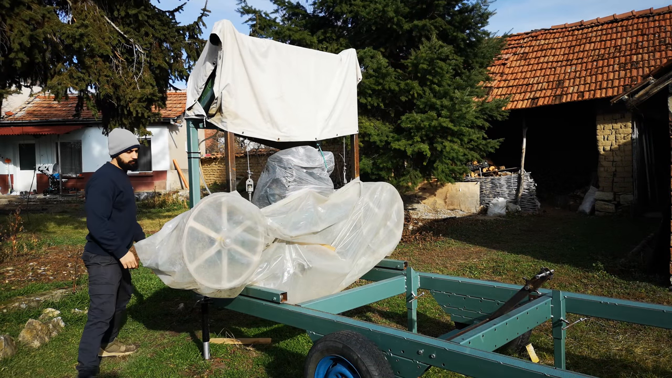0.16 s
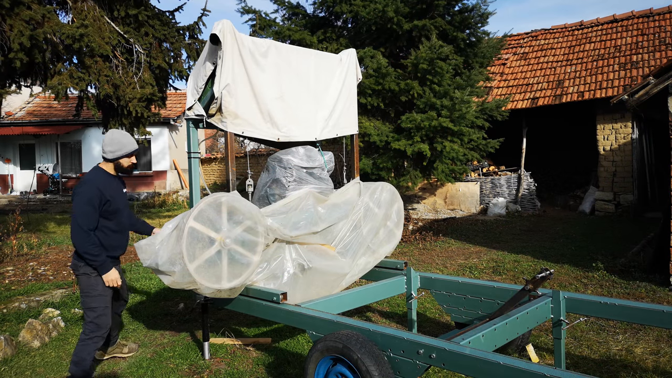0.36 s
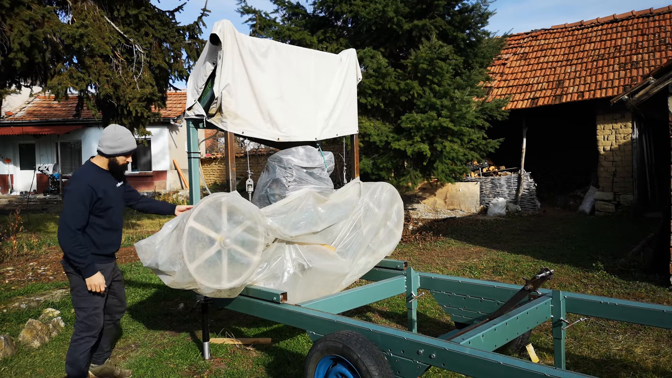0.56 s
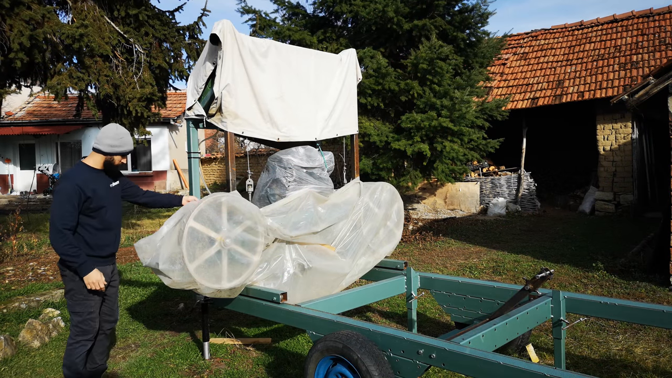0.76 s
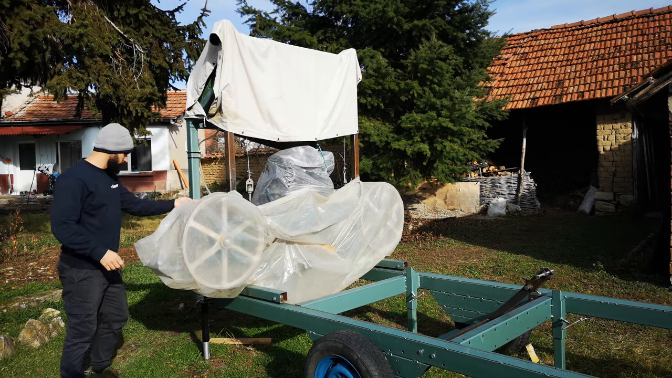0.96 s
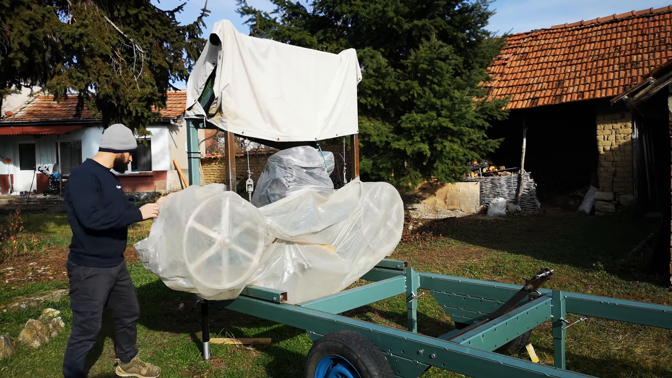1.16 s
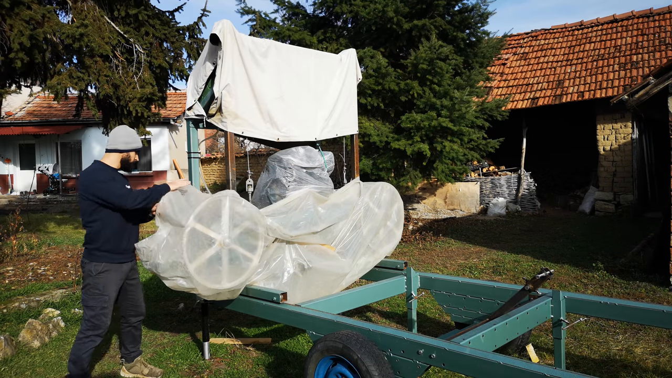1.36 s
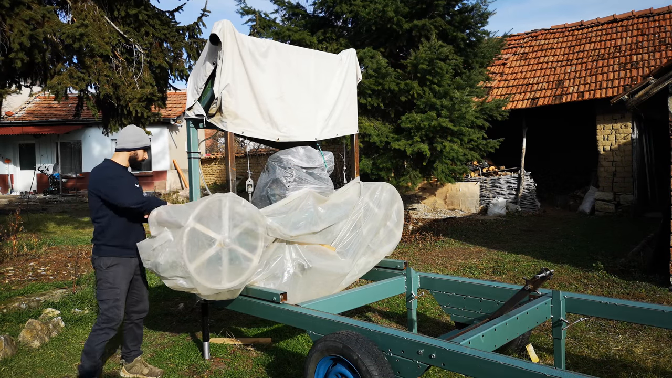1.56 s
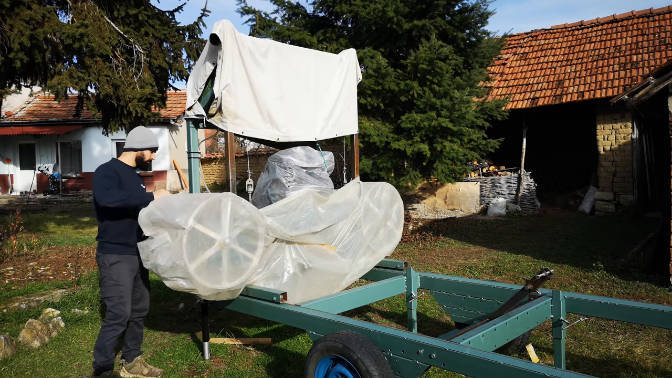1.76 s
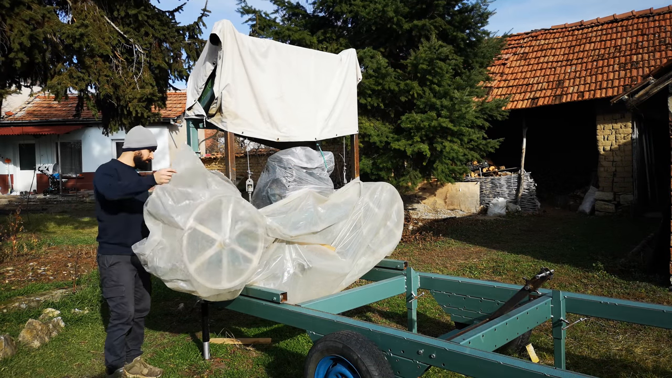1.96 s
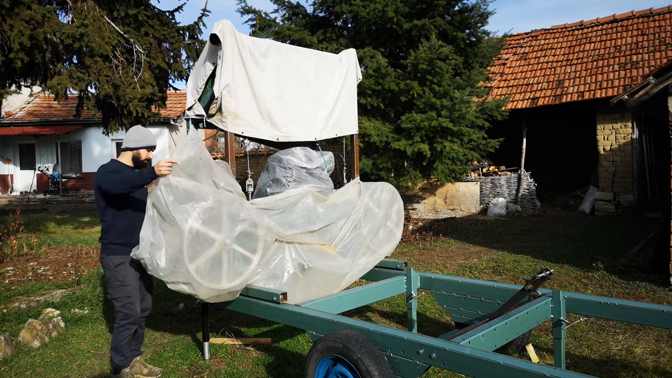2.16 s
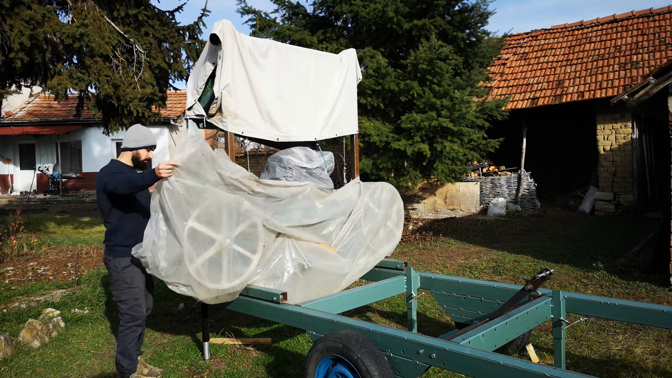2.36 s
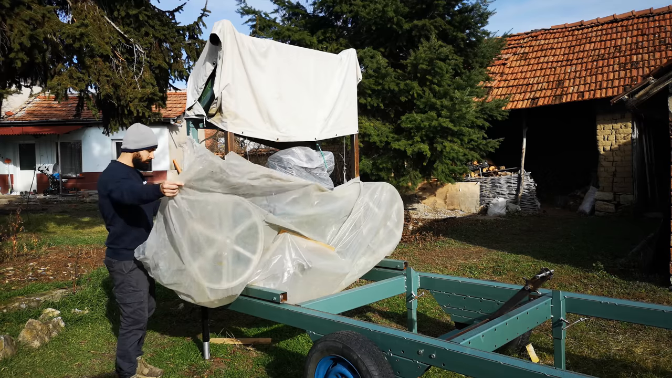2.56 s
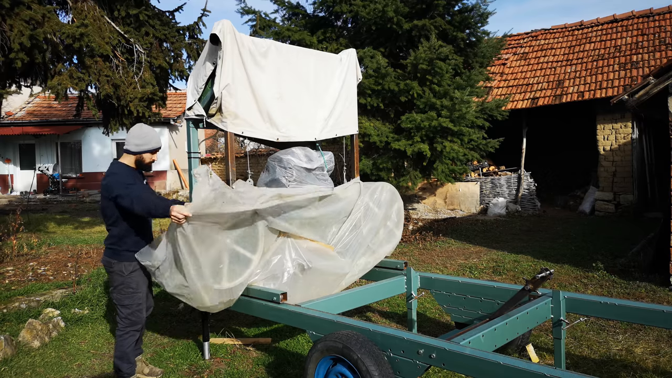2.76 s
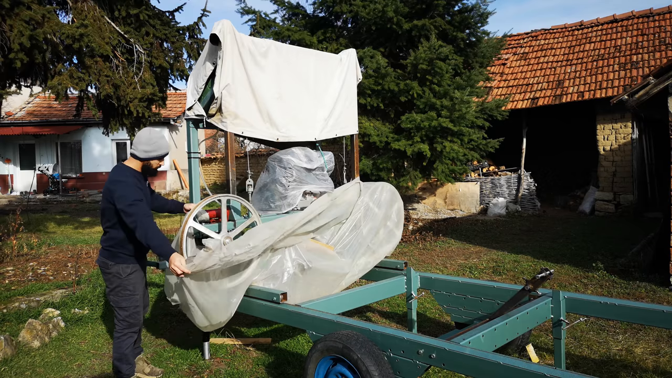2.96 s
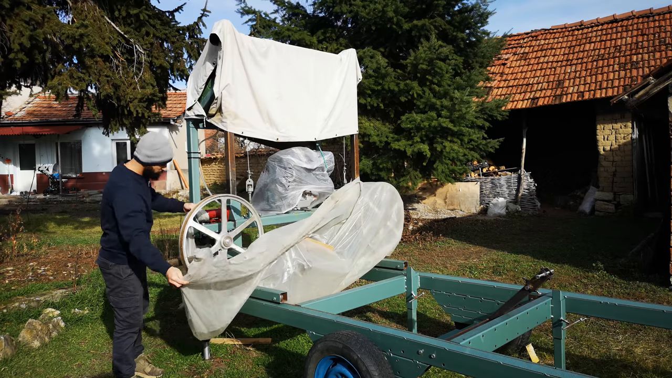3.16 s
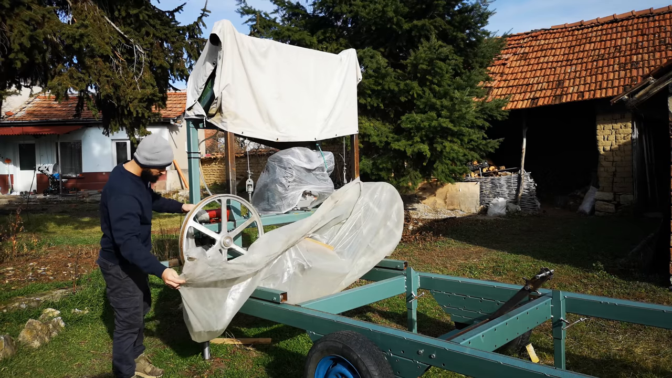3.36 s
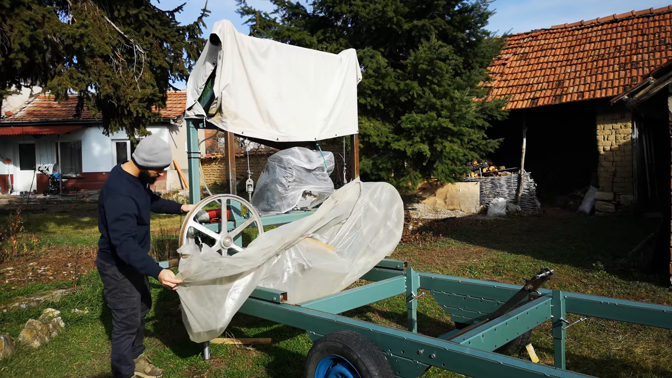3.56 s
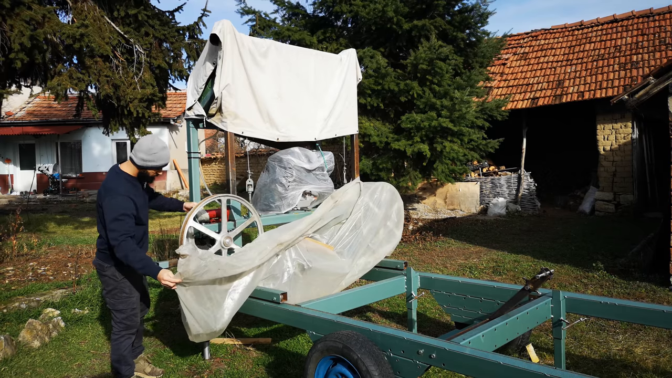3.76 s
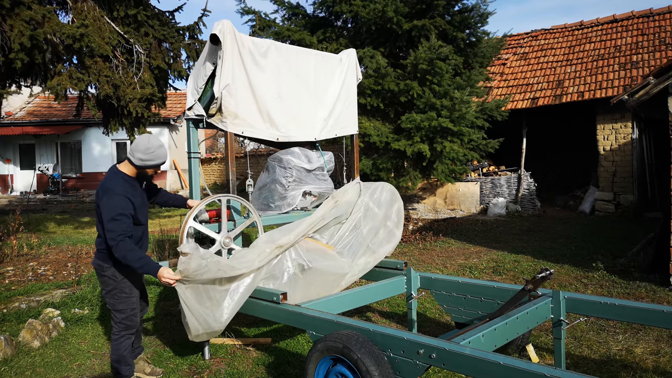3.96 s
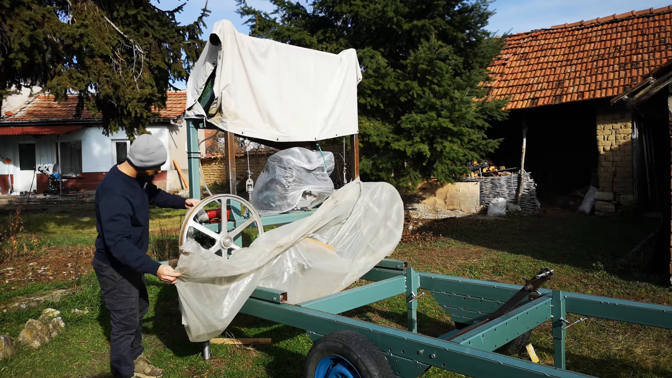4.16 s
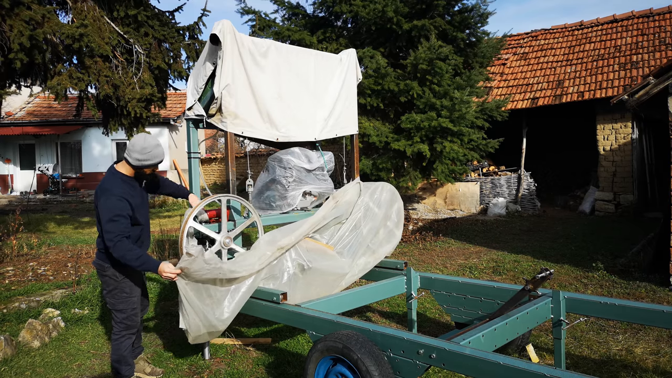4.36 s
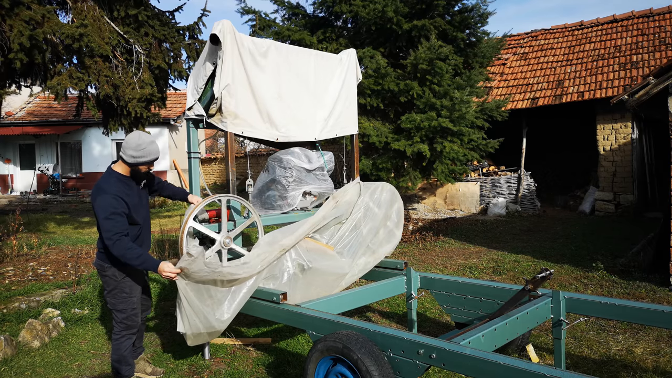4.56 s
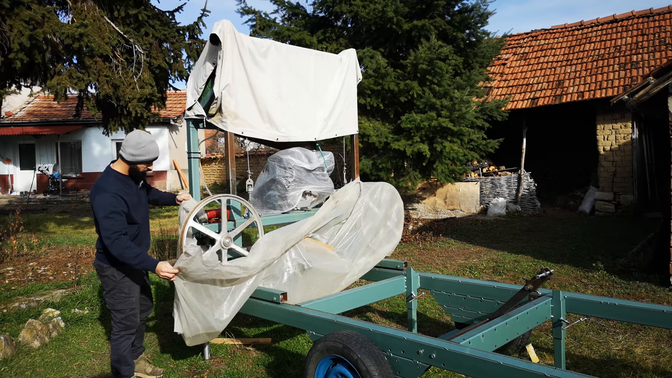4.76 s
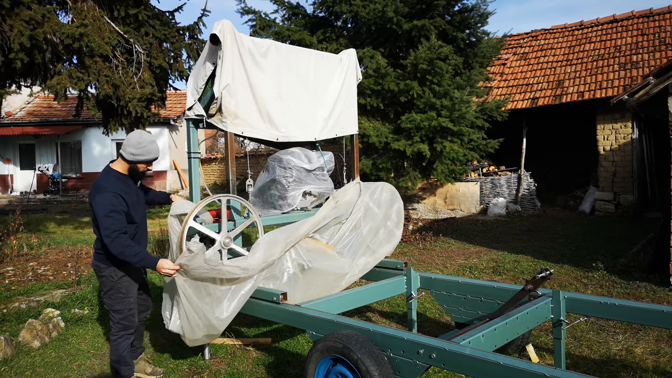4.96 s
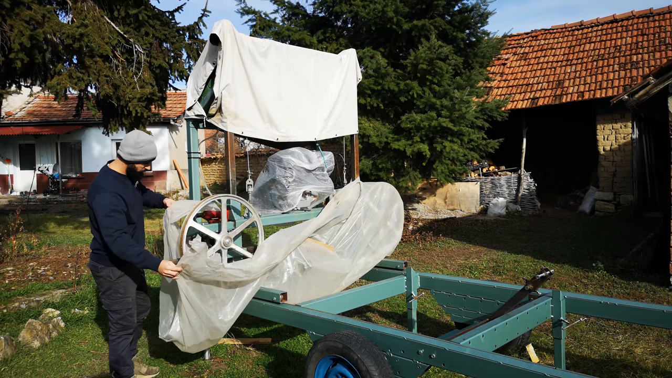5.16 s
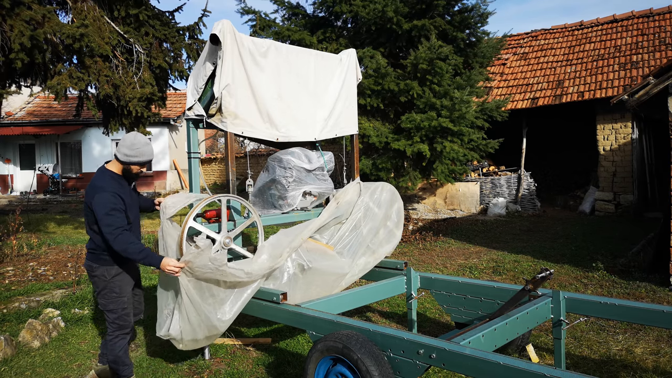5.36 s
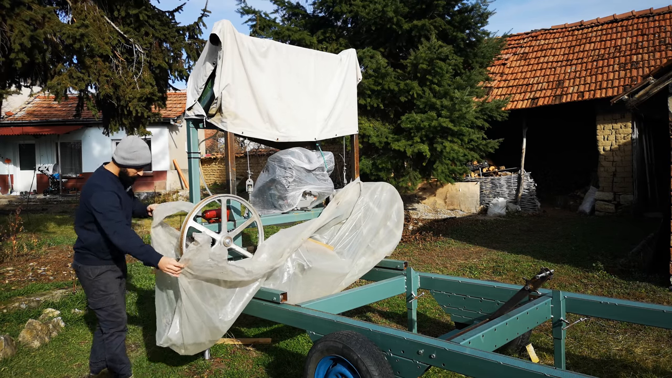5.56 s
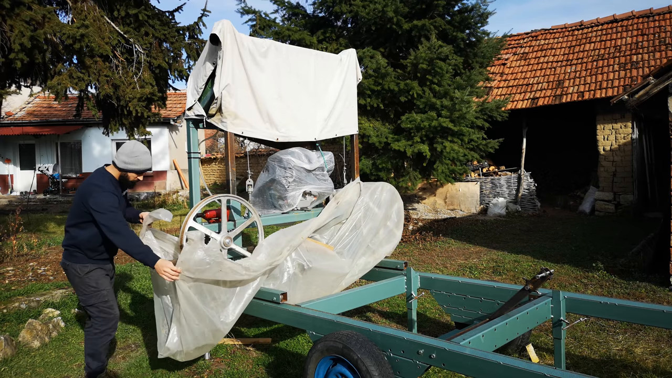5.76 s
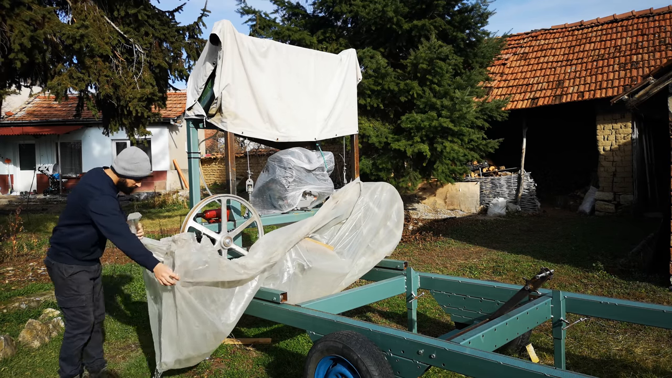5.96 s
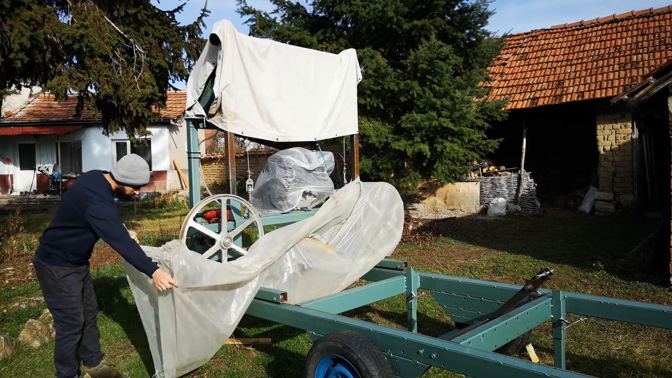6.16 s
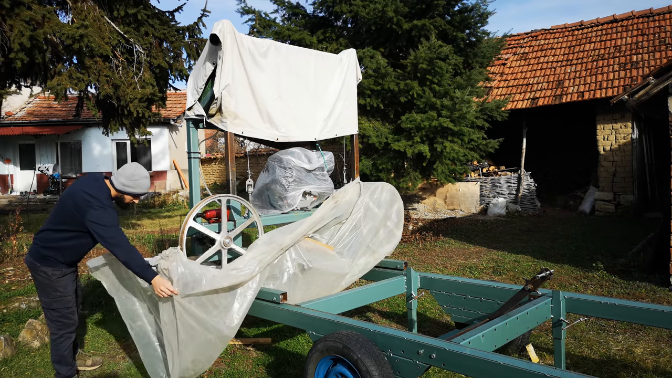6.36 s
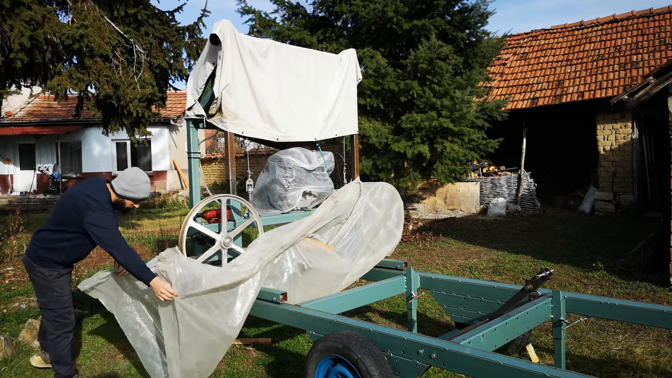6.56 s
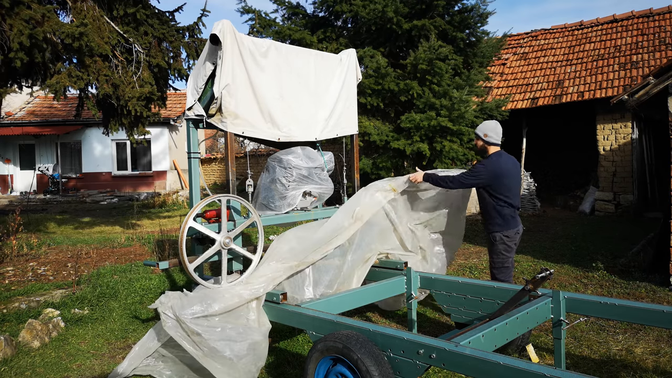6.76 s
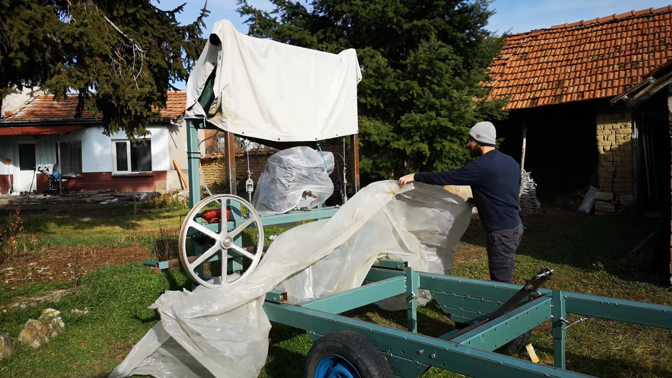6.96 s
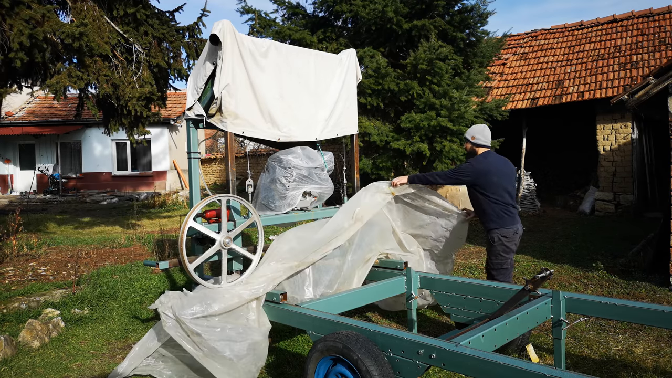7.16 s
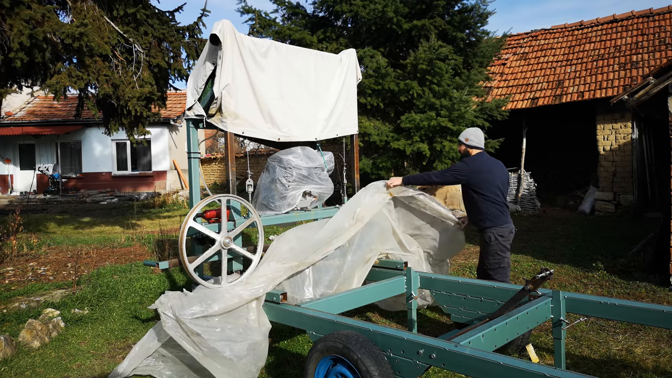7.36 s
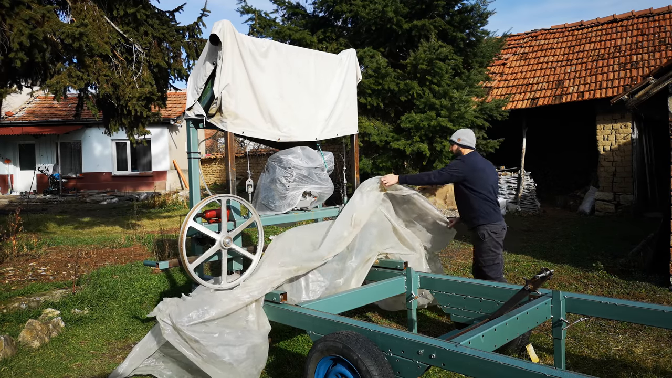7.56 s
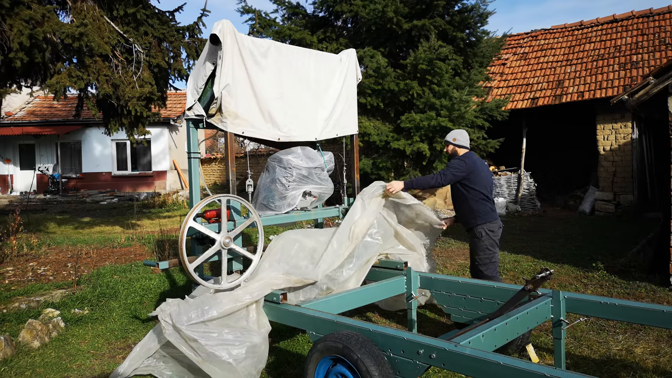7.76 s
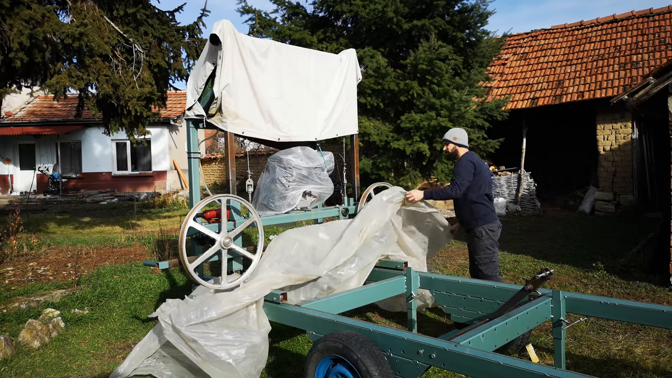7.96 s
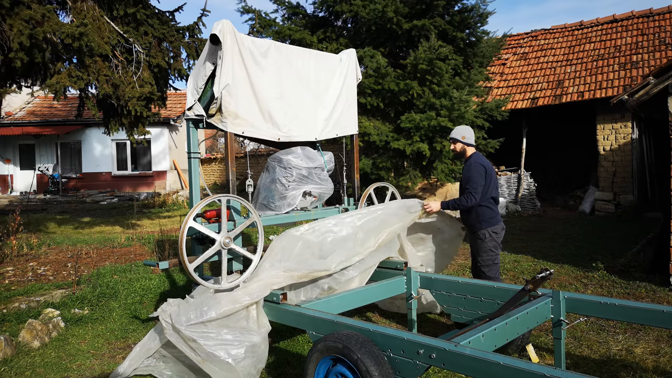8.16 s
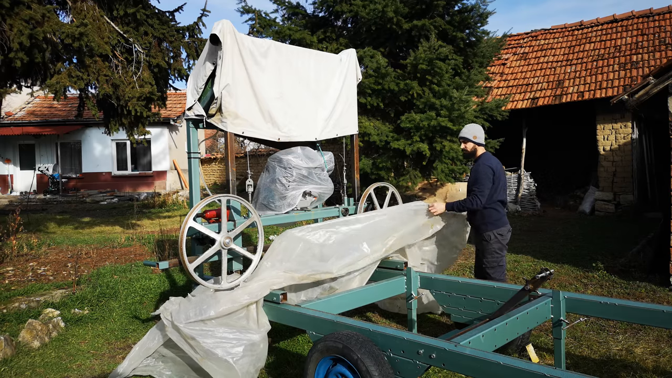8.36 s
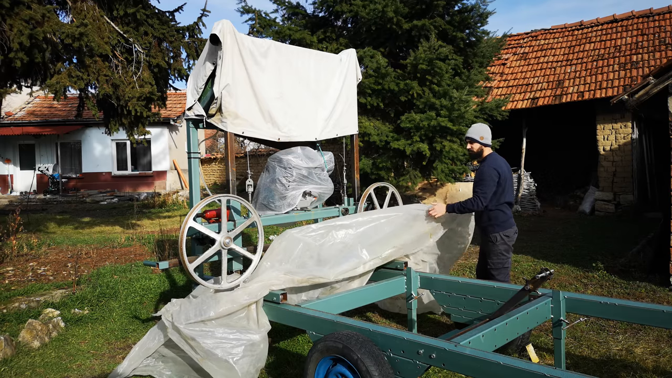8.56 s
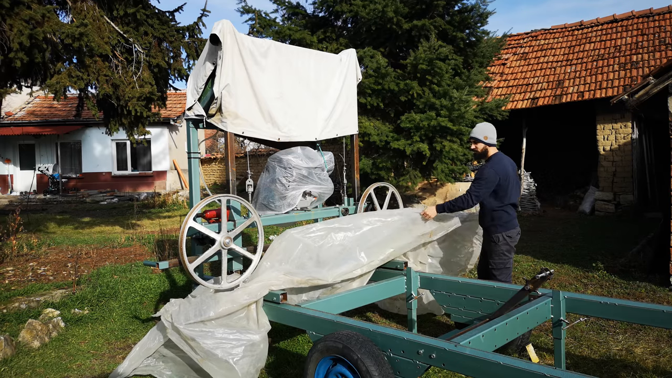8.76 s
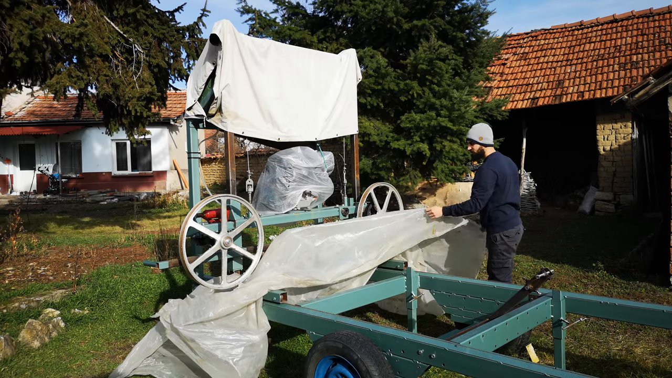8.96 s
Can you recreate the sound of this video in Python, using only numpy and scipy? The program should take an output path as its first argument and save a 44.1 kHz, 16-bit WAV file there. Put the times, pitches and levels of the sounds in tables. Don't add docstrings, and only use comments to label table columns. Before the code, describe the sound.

Thin plastic sheeting crinkles, crackles and snaps in uneven tugs as it is dragged off a metal frame in a quiet yard.

```python
import sys
import numpy as np
from scipy import signal
from scipy.io import wavfile
from scipy.ndimage import uniform_filter1d

SR = 44100
rng = np.random.default_rng(int(sys.argv[2]) if len(sys.argv) > 2 else 0)


def volts_from_db(level):
    exponent = np.asarray(level, float) / 20
    return 10 ** exponent


def waveform_to_disk(signal):
    frames = np.transpose(np.atleast_2d(signal))
    scaled = np.clip(frames, -1, 1) * 32767
    samples = np.round(scaled).astype(np.int16)
    wavfile.write(sys.argv[1], SR, samples)


N = 396900

# [f/Hz, density/dB per Hz]
SHEET_COLOUR = [(60, -47), (150, -15), (290, -12), (600, -13.5), (1000, -5.5), (1920, 0.5), (2700, -2),
                (4100, -9), (5500, -6.5), (6350, -12), (7800, -8), (8400, -16.5), (9900, -23.5),
                (15000, -33)]
# [t/s, lag of the right port/samples]
HANDLER_LAG = [
    (0, 5),
    (6.72, 5),
    (6.76, -3),
    (9, -3),
]
# [t/s, level/dB]
SLACK_CURVE = [
    (0, 6.5),
    (1.5, -1),
    (3, 0.5),
    (4, -4.5),
    (4.9, -6),
    (5.3, 3.5),
    (6.5, 4),
    (7.5, 1.5),
    (9, 6.5),
]
# [t/s, peak level/dB, ring f/Hz]
FOLD_POPS = [(0.737, -43, 1560), (0.787, -36, 1700), (0.893, -36, 1750), (1.244, -32, 1690),
             (1.357, -35, 1450), (1.419, -33, 1740), (1.447, -35, 1850), (2.118, -27, 2220),
             (2.146, -38, 1770), (2.259, -37, 1850), (2.328, -34, 1930), (2.658, -32, 2100),
             (2.97, -37, 1850), (3.026, -35, 1900), (3.169, -34, 1870), (3.194, -26, 2540),
             (4.046, -48, 1920), (4.08, -35, 1580), (4.149, -34, 1900), (4.224, -30, 2580),
             (4.275, -27.5, 1930), (4.355, -39, 1740), (4.655, -35, 1800), (4.709, -23.5, 1880),
             (4.737, -27, 1830), (4.833, -41, 2220), (4.85, -30.5, 2010), (4.905, -36, 1920),
             (5.024, -31, 1850), (5.056, -36, 1820), (5.128, -34, 1970), (5.238, -37, 2190),
             (5.293, -33, 1160), (5.876, -33, 1750), (5.936, -36, 1710), (5.969, -28, 2390),
             (6.092, -37, 1890), (6.161, -34, 2400), (6.178, -27, 1930), (6.222, -34, 1530),
             (6.67, -36, 1290), (6.807, -44, 2350), (6.928, -39, 1380), (6.994, -32, 1510),
             (7.155, -45, 1910), (7.219, -35.5, 1720), (7.367, -37, 2550), (7.574, -42, 2450),
             (7.601, -41, 1880), (7.738, -33, 2260), (7.831, -34, 2380), (7.992, -38, 2800),
             (8.237, -40, 1850), (8.262, -37, 1580), (8.313, -43, 2000), (8.334, -28, 1330),
             (8.386, -32, 2410), (8.431, -28, 1840), (8.862, -39, 1970), (8.967, -40, 1220)]
# [t/s, peak level/dB]
CREASE_TICKS = [(0.7214, -45), (0.7876, -39), (0.875, -36), (0.893, -28), (1.3583, -31), (1.3754, -33),
                (1.446, -36), (1.631, -40), (2.146, -34), (2.6145, -30), (2.6572, -29), (2.7215, -23),
                (2.8735, -29), (2.969, -38), (3.1088, -27), (3.3932, -46), (3.467, -54), (3.6002, -44),
                (3.8864, -45), (4.0484, -42), (4.149, -44), (4.905, -38), (4.9342, -27), (5.059, -37),
                (5.126, -35), (5.1494, -29), (5.2127, -30), (5.2395, -34), (5.2929, -29), (5.6062, -53),
                (5.656, -35.5), (5.7374, -48), (5.7603, -47), (5.8042, -32), (5.9678, -40), (6.092, -29),
                (6.162, -26), (6.1915, -21), (6.2237, -32), (6.3265, -33), (6.3824, -37), (6.541, -38),
                (6.8823, -39), (7.003, -34), (7.1551, -49), (7.1807, -42), (7.3672, -27.5), (7.4654, -41),
                (7.5752, -36), (7.992, -32), (8.059, -56), (8.105, -51), (8.2003, -49), (8.2372, -37),
                (8.2631, -40), (8.3323, -41), (8.3833, -19), (8.4124, -36), (8.4314, -26), (8.4776, -27)]
# [t/s, peak level/dB]
MORE_TICKS = [(1.0006, -49), (1.0231, -51), (1.045, -44), (1.0869, -40), (1.117, -42), (1.1806, -33),
              (1.4897, -44), (1.541, -40), (1.6651, -36), (1.7953, -30), (1.8194, -35), (1.8447, -33),
              (1.9051, -39), (1.9674, -38), (2.0354, -33), (2.057, -40), (2.4468, -32), (3.0849, -35),
              (3.312, -38), (3.3538, -44), (3.9424, -47), (4.125, -41), (4.1764, -43), (4.2984, -36),
              (4.3934, -40), (4.4376, -33), (4.471, -37), (4.5121, -45), (4.6199, -34), (4.814, -23.5),
              (5.0874, -36), (5.3254, -41), (5.3961, -45), (5.48, -42), (5.6311, -45), (5.782, -43),
              (5.8436, -41), (6.1116, -33), (6.3485, -40), (6.8528, -55), (6.9576, -40), (7.13, -36),
              (7.1957, -41), (7.248, -42), (7.296, -49), (7.348, -39), (7.4116, -47), (7.4464, -46),
              (7.4944, -43), (7.5408, -36), (8.0461, -44), (8.285, -36), (8.527, -48), (8.5485, -41),
              (8.6, -47), (8.635, -52), (8.6857, -54), (8.7014, -47), (8.7804, -49), (8.8854, -45)]


def evened(x):
    return x / np.sqrt(np.mean(x ** 2) + 1e-20)


def read(points, hz):
    f, value = np.transpose(points)
    return np.interp(np.log(hz + 1), np.log(f + 1), value)


def response(points):
    log_gain = np.log(volts_from_db(read(points, abs(np.fft.fftfreq(8192, 1 / SR)))))
    return np.fft.ifft(np.exp(np.conj(signal.hilbert(log_gain)))).real[:4096]


def colour(x, points):
    return signal.oaconvolve(x, response(points)[None], axes=1)[:, :N]


def yard():
    # [f/Hz, density/dB per Hz]
    murmur = [(53, -18), (90, 0), (183, -9.5), (574, -6.5), (626, -4), (1300, -14), (1690, -10),
              (3990, -19), (7450, -21.5), (10100, -32), (15500, -23)]
    # [f/Hz, correlation]
    likeness = [(60, 0.43), (150, 0.9), (300, 0.019), (600, -1), (1500, -0.041), (15000, 0.068)]
    frames, hz = N // 256 + 5, np.fft.rfftfreq(1024, 1 / SR)
    a, b, c, d = rng.standard_normal((frames, 513, 4)).T
    same = np.clip(read(likeness, hz), -1, 1)[:, None]
    left = a + 1j * b
    right = same * left + np.sqrt(1 - same ** 2) * (c + 1j * d)
    z = np.array([left, right]) * volts_from_db(read(murmur, hz))[:, None]
    noise = signal.istft(z, nperseg=1024, noverlap=768)[1][:, :N]
    return volts_from_db(-71.0) * evened(noise)


def swells(rows, roundness, rest_db, s):
    power = volts_from_db(2 * rest_db)
    for peak, rise, fall, db in rows:
        away = np.where(s < peak, (peak - s) / rise, (s - peak) / fall)
        power = power + volts_from_db(2 * (db - 20 * away ** roundness))
    return 10 * np.log10(power)


def pull(s):
    # [peak t/s, rise/s, fall/s, effort/dB, tautness/dB]
    tug_rows = [(0.43, 0.1, 0.04, -74, -20.0), (0.82, 0.14, 0.036, -52.5, -8),
                (0.889, 0.15, 0.065, -43.5, -4.5), (1.12, 0.15, 0.1, -52.5, -21), (1.24, 0.17, 0.25, -44, -7.5),
                (1.329, 0.12, 0.12, -40, -5.5), (1.52, 0.45, 0.096, -53, -7.5),
                (1.68, 0.069, 0.13, -47.5, -7.5), (1.85, 0.25, 0.036, -45, -11.5), (2.04, 0.23, 0.14, -47, -11),
                (2.13, 0.054, 0.94, -43.5, -11.5), (2.26, 0.11, 0.067, -43.5, -6.5),
                (2.46, 0.053, 0.45, -48, -2), (2.63, 0.21, 0.11, -50, 5.5), (2.69, 0.036, 0.053, -45, -3.5),
                (2.891, 0.29, 0.089, -43, 2.5), (2.99, 0.052, 0.15, -48.5, -12), (3.15, 0.27, 0.22, -46.5, -6),
                (3.32, 0.15, 0.53, -53.5, -21), (3.47, 0.05, 0.45, -81, -13),
                (4.02, 0.2, 0.04, -58, -13), (4.08, 0.094, 0.36, -49.5, -9.5),
            (4.291, 0.064, 0.043, -46.5, -6.5), (4.38, 0.11, 0.16, -52.5, -9.5),
            (4.67, 0.22, 0.45, -49, -9), (4.72, 0.028, 0.042, -44, -4.5), (4.84, 0.18, 0.42, -49.5, -1),
            (5.06, 0.26, 0.061, -47, -20), (5.141, 0.058, 0.24, -45, -7), (5.25, 0.019, 0.058, -49, -20),
            (5.41, 0.11, 0.32, -55, -5.5), (5.638, 0.047, 0.06, -62, -7), (5.81, 0.22, 0.032, -58, -5),
            (5.93, 0.16, 0.29, -49.5, -4), (6.09, 0.043, 0.15, -53.5, 0.5), (6.181, 0.021, 0.39, -47, -3.5),
            (6.35, 0.069, 0.12, -47.5, -3.5), (6.41, 0.036, 0.043, -42, -14),
            (6.51, 0.041, 0.14, -52.5, -12), (6.69, 0.14, 0.14, -53.5, -13),
                (6.81, 0.025, 0.031, -59, -30), (7.0, 0.23, 0.098, -58, -9), (7.0, 0.11, 0.077, -50, -7.5),
            (7.24, 0.42, 0.12, -57, -8), (7.37, 0.04, 0.14, -59.5, -6), (7.46, 0.046, 0.15, -57.5, -4.5),
            (7.64, 0.16, 0.21, -43, -9.5), (7.78, 0.31, 0.1, -44, -5), (7.85, 0.033, 0.086, -41.5, -10.5),
            (7.99, 0.026, 0.15, -62, -23), (8.152, 0.16, 0.061, -57.5, -12), (8.26, 0.21, 0.43, -55.5, -24),
            (8.4, 0.18, 0.084, -44, -7.5), (8.58, 0.05, 0.29, -60.5, -7), (8.7, 0.13, 0.45, -60, -21),
            (8.89, 0.09, 0.18, -54, -4.5), (8.98, 0.035, 0.035, -52.5, -19),
                (0.72, 0.021, 0.054, -62, 0),
        (3.605, 0.013, 0.046, -65, 5.5),
        (6.73, 0.37, .02, -68, -0.5),
        (3.71, .01, .03, -77, -6),
        (3.63, .02, 0.05, -73, 4),
        (8.2, 0.024, 0.036, -59, -2),
    ]
    tug_round, idle_db, idle_taut_db = 2.0, -72.5, -1
    grid, tugs = np.arange(0, N / SR, 1 / 200), tug_rows
    effort = swells([row[:4] for row in tugs], tug_round, idle_db, grid)
    taut_rows = [(*row[:3], row[3] + row[4]) for row in tugs]
    taut = swells(taut_rows, tug_round, idle_db + idle_taut_db, grid)
    folds = -11.5 + 0.13 * (effort + 50) + 0.55 * np.interp(grid, *np.transpose(SLACK_CURVE))
    return [np.interp(s, grid, c) for c in (effort, folds, taut - effort)]


def drift(low_hz, high_hz):
    sos = signal.butter(1, [low_hz, high_hz], "band", fs=SR, output="sos")
    return evened(signal.sosfilt(sos, signal.sosfilt(sos, rng.standard_normal(N))))


def air_push():
    # [f/Hz, density/dB per Hz]
    push_colour = [(11, -36), (22, 6.5), (45, -3.5), (75, -8.5), (130, -45), (400, -96)]
    # [f/Hz, density/dB per Hz]
    flutter_colour = [(30, -39), (65, -4), (120, -4.5), (210, -10), (400, -38.5), (900, -78)]
    # [peak t/s, rise/s, fall/s, level/dB]
    gusts = [(0.36, 0.038, 0.062, -52), (0.67, 0.049, 0.035, -47), (0.75, 1.0, 0.64, -71),
             (1.1, 0.066, 0.85, -52), (2.31, 0.12, 0.16, -46), (2.45, 0.058, 0.16, -37),
             (2.46, 0.59, 0.74, -57), (2.65, 0.056, 0.054, -41.5), (2.88, 0.046, 0.074, -42),
             (3.0, 0.98, 0.073, -47), (3.42, 0.24, 0.073, -58.5), (3.89, 0.1, 0.21, -48),
             (4.14, 0.055, 0.048, -43), (4.28, 1.0, 0.33, -55), (4.64, 0.066, 0.067, -44.5),
             (4.8, 0.58, 0.18, -56.5), (5.05, 0.086, 0.067, -53.5), (5.26, 0.15, 0.093, -49),
             (5.43, 0.35, 0.066, -57.5), (6.01, 0.24, 0.11, -55), (6.25, 0.11, 0.23, -54),
             (6.55, 0.39, 0.053, -58), (6.69, 0.049, 0.087, -45.5), (7.23, 0.39, 0.15, -60),
             (7.67, 0.27, 0.68, -61.5), (8.4, 0.18, 0.08, -65), (8.66, 0.066, 0.11, -64)]
    flap_db, gust_flutter_db, still_flutter_db = -15.5, -45, -77
    t, out = np.arange(0, N / SR, 1 / 200), 0
    push_db = swells(gusts, 1.5, -72, t)
    flap = pull(t)[0] + flap_db + np.interp(t, *np.transpose(SLACK_CURVE))
    flutter = volts_from_db(2 * flap) + volts_from_db(2 * (push_db + gust_flutter_db)) + volts_from_db(2 * still_flutter_db)
    flutter_db = 10 * np.log10(flutter)
    for points, db in ((push_colour, push_db + 0.5), (flutter_colour, flutter_db + 1.18)):
        lumps = rng.standard_normal((3, N)) * volts_from_db(2.8 * drift(5.4, 20.4))
        ports = lumps[0] + 0.14 * lumps[1:]
        out = out + evened(colour(ports, points)) * volts_from_db(np.interp(np.arange(N) / SR, t, db))
    return out


def slips(per_s, fade_s, pop_size):
    starts = (rng.random(N) < per_s / SR) * np.minimum(.2 * rng.exponential(1, N), .3)
    starts[[round(row[0] * SR) for row in FOLD_POPS + CREASE_TICKS + MORE_TICKS]] = pop_size
    release = np.log(signal.lfilter([1], [1, -np.exp(-1 / (fade_s * SR))], starts) + 0.083)
    return evened(release - release.mean())


def place(s, size, scatter):
    late = np.interp(s, *np.transpose(HANDLER_LAG)) + 2.2 * scatter
    at = np.array([s * SR, s * SR + late]).round().astype(int).clip(0, N - 1)
    sizes = size * volts_from_db([1.7 * scatter, -1.5 * scatter])
    return np.array([np.bincount(a, w, N) for a, w in zip(at, sizes)])


def buckle(hz, cycles):
    turns = np.arange(min(1200, round(10 * (cycles + .5) * SR / hz))) / SR * hz
    pulse = np.sin(2 * np.pi * turns) * (1 - np.exp(-turns / 0.4)) * np.exp(-turns / cycles)
    return pulse / np.linalg.norm(pulse)


def creases(count, spread_db, cycles, clump_db, patch_db, eager, taut, top_hz, kinds=20):
    when, kind, big, sign, scatter = rng.random((count, 5)).T
    s = when * N / SR
    kind = (kind * kinds).astype(int)
    pitches = np.geomspace(150, top_hz, kinds)
    hz = pitches[kind]
    clumps = slips(7.2, 0.017, 0.29)[(when * N).astype(int)]
    spells = uniform_filter1d(rng.standard_normal((1000, kinds)), size=4, axis=0)
    spells = evened(uniform_filter1d(spells, size=2, axis=1))
    patches = spells[(when * 1000).astype(int), kind]
    luck_db = spread_db * np.minimum(-np.log(big + 1e-9), 3.2)
    size = volts_from_db(luck_db + clump_db * clumps + patch_db * patches)
    size = evened(size) * np.sign(sign - .5) * np.sqrt(hz / count)
    effort, body, bright = pull(s)
    wide = np.clip(np.log2(1100 / hz), 0, 1)
    tight = np.clip(np.log2(hz / 3000), 0, 1)
    size *= volts_from_db(0.19 * np.clip(-48 - effort, 0, 15) * (clumps - 1.08))
    growth = eager * np.minimum(effort + 55, 0)
    size *= volts_from_db(effort + wide * (body + 13.5) + taut * tight * (bright + 7.0) + growth)
    out = np.zeros((2, N))
    for k in range(kinds):
        mine = kind == k
        train = place(s[mine], size[mine], np.sqrt(12) * (scatter[mine] - .5))
        out += signal.oaconvolve(train, buckle(pitches[k], cycles)[None], axes=1)[:, :N]
    return out


def snaps(rows, cycles, click_db, after_db, after_s):
    out, cavity = np.zeros((2, N + 1000)), response(SHEET_COLOUR)[:400]
    chance = rng.standard_normal((len(rows), 801))
    t = np.arange(800) / SR
    for (s, db, hz), luck in zip(rows, chance):
        flip = buckle(hz, cycles)
        flip[:2] += volts_from_db(click_db) * np.array([1, -1])
        after = np.clip(luck[1:] ** 3, -12, 12) * np.exp(-t / after_s) * volts_from_db(after_db)
        shower = (t == 0) + after
        sound = np.convolve(shower, np.convolve(flip, cavity)[:500])[:800]
        late = np.interp(s, *np.transpose(HANDLER_LAG)) + luck[0]
        heard = max(abs(np.cos(np.pi * hz * round(late) / SR)), .55)
        for port, at, side in zip(out, (round(s * SR), round(s * SR + late)), (1, -1)):
            port[at:at + 800] += volts_from_db(db + .7 * side * luck[0]) * sound / abs(sound).max() / heard
    return out[:, :N]


def rub():
    # [start t/s, end t/s, level/dB, f/Hz, width/Hz]
    slides = [
        (2.775, 2.833, -46, 7500, 700),
        (3.217, 3.342, -57.5, 1740, 200),
        (3.889, 3.97, -64.5, 1780, 143),
        (3.961, 4.035, -61.5, 1785, 140),
        (5.121, 5.31, -59, 826, 298),
        (6.44, 6.73, -63.5, 7550, 1300),
        (6.442, 6.738, -69.5, 5460, 800),
    ]
    out = np.zeros((2, N))
    for start, end, db, hz, width_hz in slides:
        t = np.arange(0, end - start, 1 / SR)
        sos = signal.butter(2, [hz - width_hz / 2, hz + width_hz / 2], "band", fs=SR, output="sos")
        hiss = rng.standard_normal((3, SR // 2))[:, :len(t)]
        fades = np.clip(np.minimum(t, t[-1] - t) / 0.0097, 0, 1)
        at = round(start * SR)
        ports = hiss[0] + hz / 5000 * hiss[1:]
        out[:, at:at + len(t)] += volts_from_db(db) * fades * evened(signal.sosfilt(sos, ports))
    return out


def walls(x):
    # [f/Hz, t60/s]
    decay = [(200, 0.68), (2000, 0.51), (6000, 0.39), (14000, 0.3)]
    taps = np.zeros((2, SR // 2))
    at = np.arange(200, SR // 2 - 20, 20) + rng.integers(0, 20, (2, (SR // 2 - 201) // 20))
    np.put_along_axis(taps, at, rng.choice([-1., 1.], at.shape), 1)
    hz, t, z = signal.stft(taps, SR, nperseg=256)
    tail = signal.istft(z * volts_from_db(-60 * t / read(decay, hz)[:, None]), SR, nperseg=256)[1]
    return signal.fftconvolve(x.mean(0)[None], tail / np.linalg.norm(tail[0]), axes=1)[:, :N]


def scene():
    # [t/s, peak level/dB, ring f/Hz]
    tight_cracks = [(0.7861, -42, 7650), (0.8739, -35, 4870), (1.2416, -41, 5640), (1.3583, -28, 7400),
                    (1.74, -33, 4890), (2.1141, -33, 7670), (2.2573, -33, 5710), (2.2772, -36, 5180),
                    (2.3057, -32, 5510), (2.3785, -42, 7560), (2.4209, -34, 5630), (2.5082, -38, 7400),
                    (2.5277, -29, 3880), (2.5865, -37, 4050), (2.615, -27, 4970), (2.6579, -31, 5480),
                    (2.8729, -29, 5900), (3.0525, -36, 5270), (3.1099, -33, 7100), (3.1508, -39, 3740),
                    (3.1692, -34.5, 5660), (3.1927, -31, 5350), (3.6002, -48, 4005), (3.8861, -52, 3800),
                    (4.0467, -47, 7780), (4.2727, -35, 5100), (4.354, -38, 7360), (4.6045, -36, 5540),
                    (4.6898, -42, 5480), (4.7082, -41, 7440), (4.8274, -31, 7900), (4.9347, -41, 5840),
                    (5.2375, -41, 5100), (5.2869, -30.5, 5190), (5.7603, -45, 5050), (5.9539, -42, 3710),
                    (5.9679, -31, 5610), (6.0916, -33, 7550), (6.1604, -36, 5120), (6.1779, -25.5, 7820),
                    (6.2687, -27, 7690), (6.3255, -39, 5400), (6.5406, -39, 7500), (6.9731, -43, 5520),
                    (6.994, -29, 4630), (7.1552, -48, 4900), (7.3677, -45, 7580), (7.5752, -39, 4470),
                    (7.5996, -33.5, 4840), (7.6341, -28, 5530), (7.8401, -30, 5610), (7.9918, -44, 3820),
                    (8.1045, -42, 4700), (8.2372, -44, 5440), (8.3325, -30, 7840), (8.3584, -33, 5240),
                    (8.3814, -38, 5850), (8.3948, -24, 4520), (8.8628, -40, 5330), (8.9241, -36, 5560)]
    # [f/Hz, left minus right/dB]
    shading = [(100, -.5), (350, -1.5), (700, .5), (1400, -3.7), (2800, -1.6), (5600, -.8), (10000, -1.8),
               (14000, -2.8)]
    rustle = volts_from_db(29.5) * creases(count=90000, spread_db=-1.0, cycles=0.67, clump_db=0.95, patch_db=2.0,
                                 eager=0.018, taut=1, top_hz=13130)
    crackle = volts_from_db(19.0) * creases(count=3000, spread_db=2.0, cycles=3.4, clump_db=3.0, patch_db=2.6,
                                  eager=0.22, taut=0.43, top_hz=8750)
    pops = snaps(FOLD_POPS, cycles=1.95, click_db=-3, after_db=-29, after_s=0.003)
    cracks = snaps(tight_cracks, cycles=1.8, click_db=-3, after_db=-31, after_s=0.003)
    small = [(*row, 2800) for row in CREASE_TICKS + MORE_TICKS]
    ticks = snaps(small, cycles=.45, click_db=0, after_db=-30, after_s=.003)
    sharp = volts_from_db(-4.0) * pops + volts_from_db(1.5) * cracks + volts_from_db(-7.5) * ticks
    soft = colour(rustle + crackle, SHEET_COLOUR) + rub()
    sheet = soft + sharp + volts_from_db(-10) * walls(soft + volts_from_db(-1) * sharp)
    ports = []
    for k, side in enumerate((1, -1)):
        shade = [(hz, side * db / 2) for hz, db in shading]
        ports.append(colour(sheet[[k]], shade)[0])
    return np.array(ports) + air_push() + yard()


def top_cut(x):
    return signal.sosfilt(signal.butter(12, 15730, fs=SR, output="sos"), x)


def record(dry):
    edge = signal.firwin(511, 15250, window=("kaiser", 9), fs=SR)
    mix = signal.oaconvolve(dry, edge[None], "same")
    return top_cut(mix)


dry = scene()
out = record(dry)
waveform_to_disk(out)
```